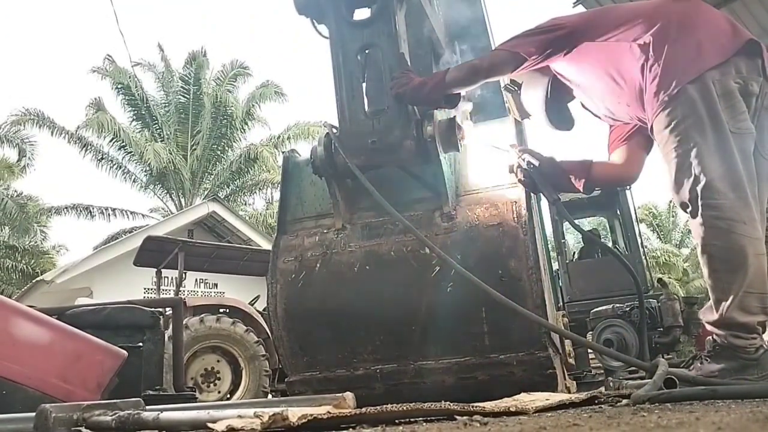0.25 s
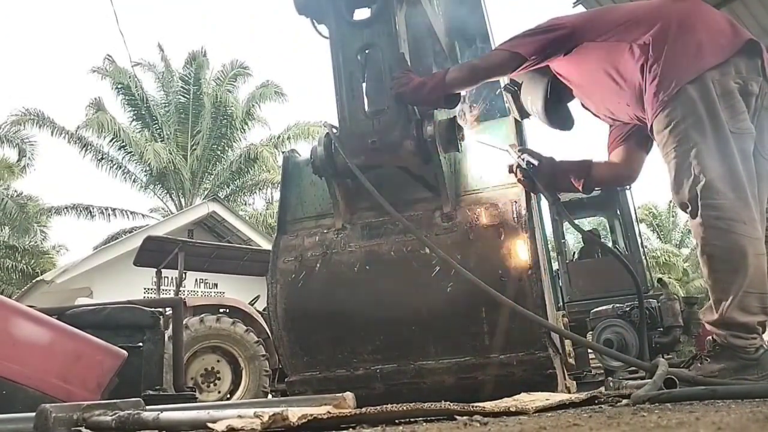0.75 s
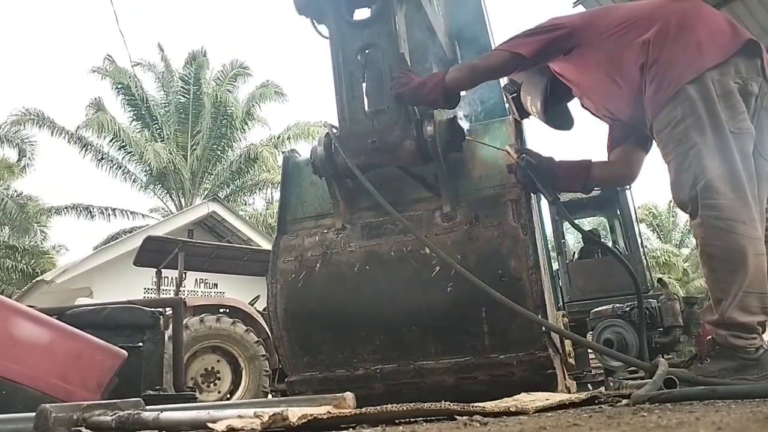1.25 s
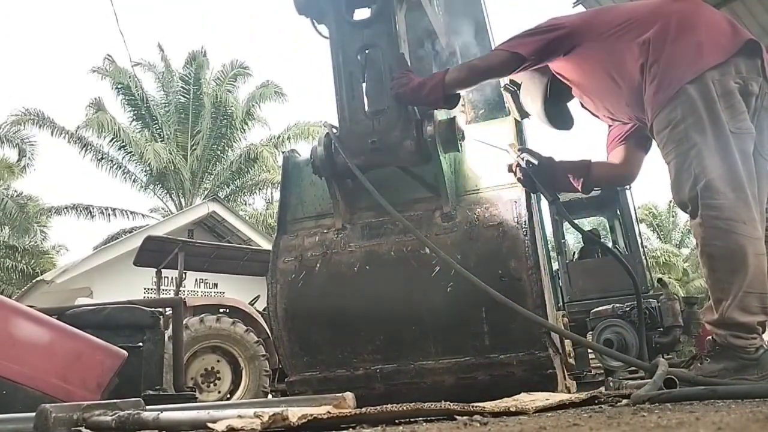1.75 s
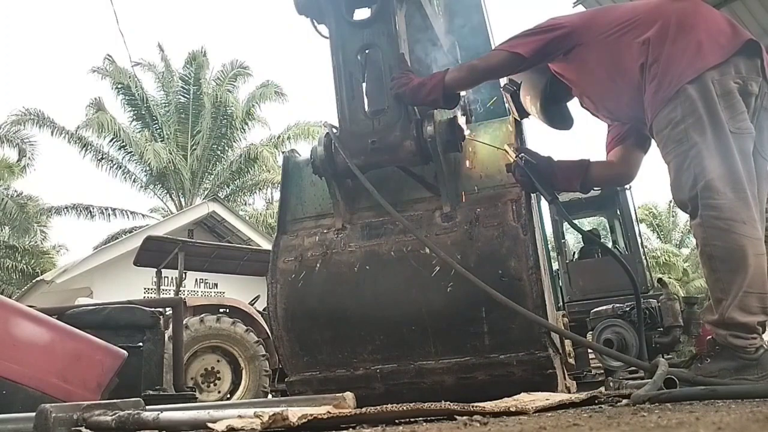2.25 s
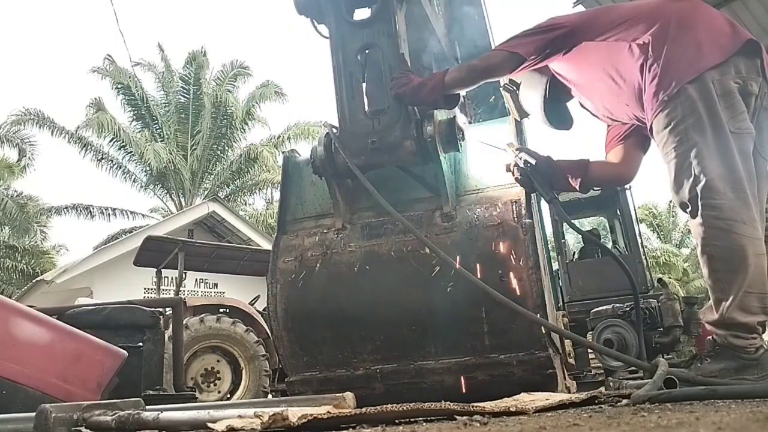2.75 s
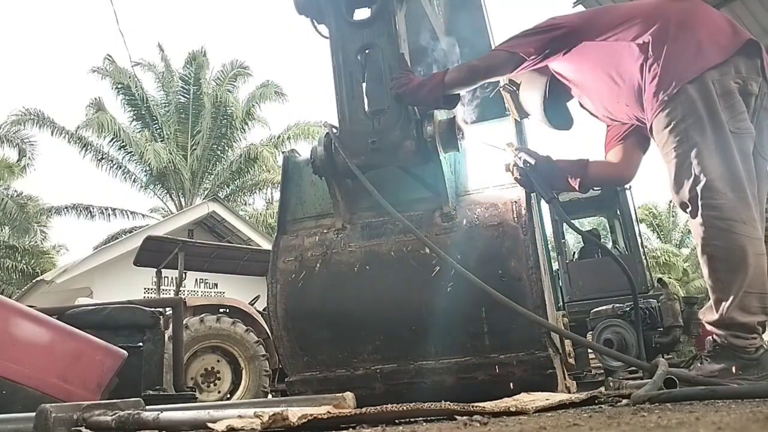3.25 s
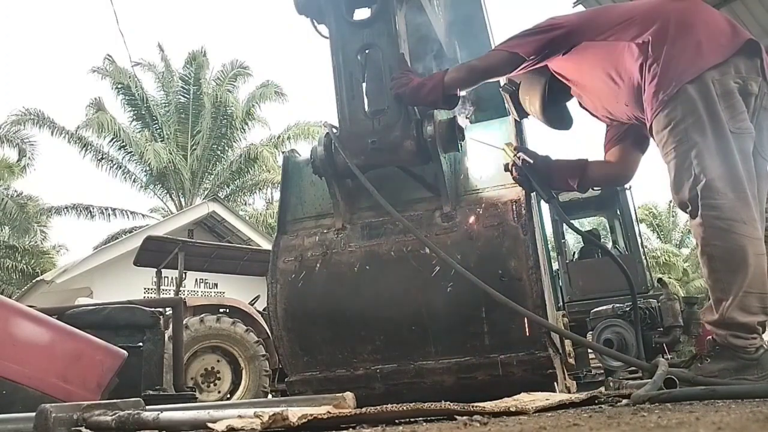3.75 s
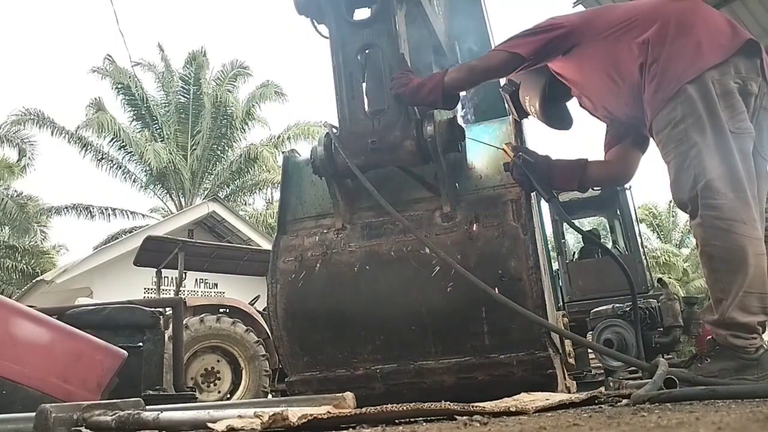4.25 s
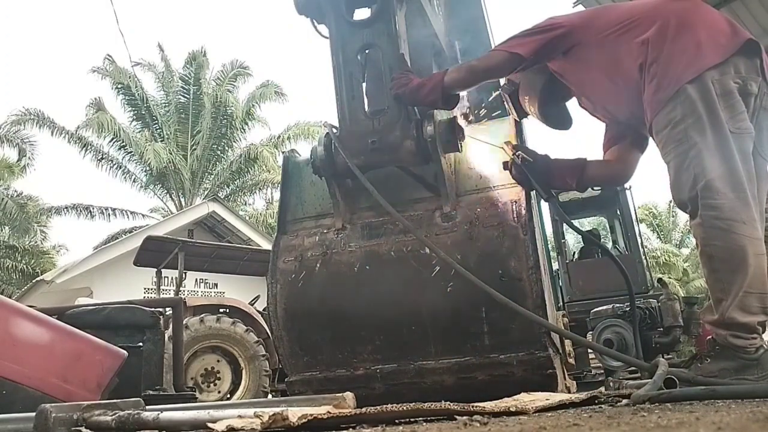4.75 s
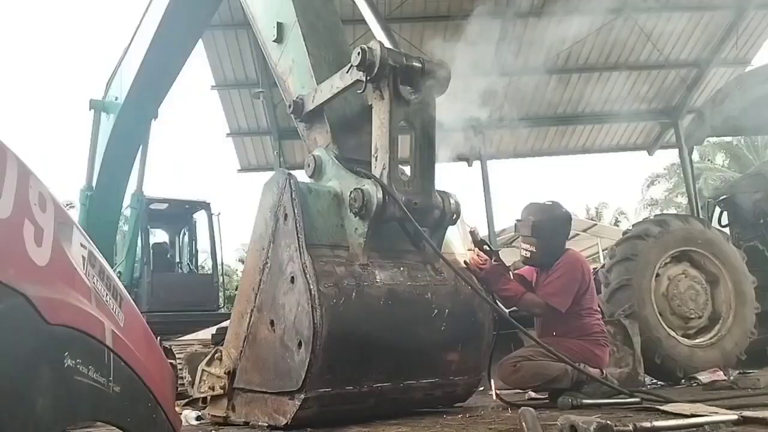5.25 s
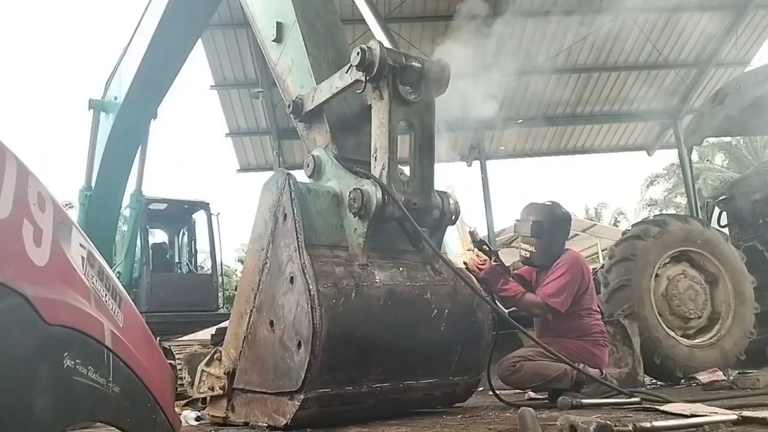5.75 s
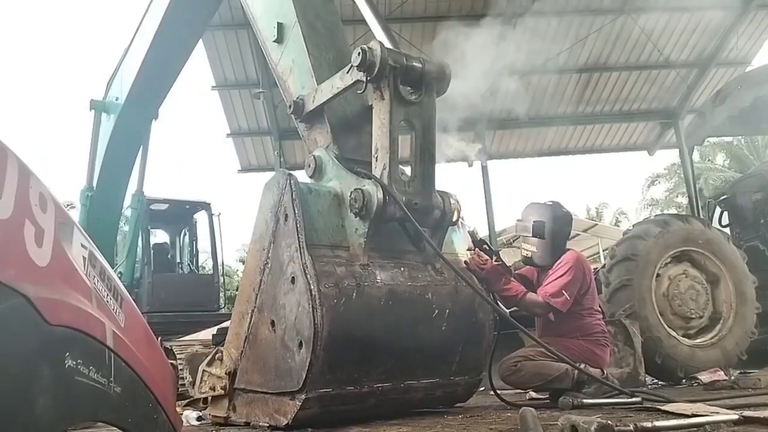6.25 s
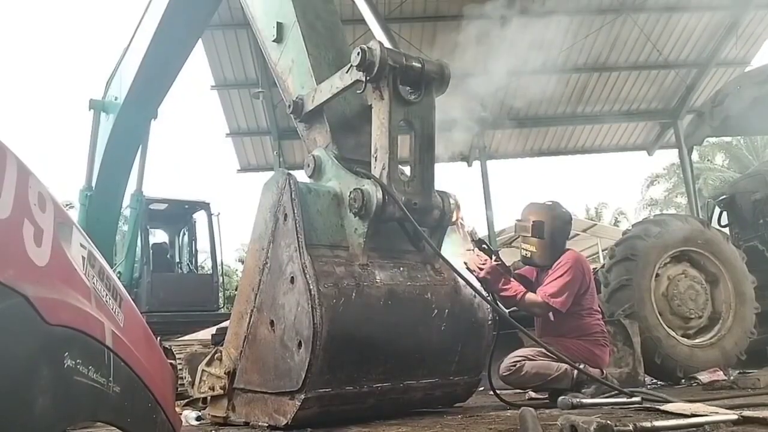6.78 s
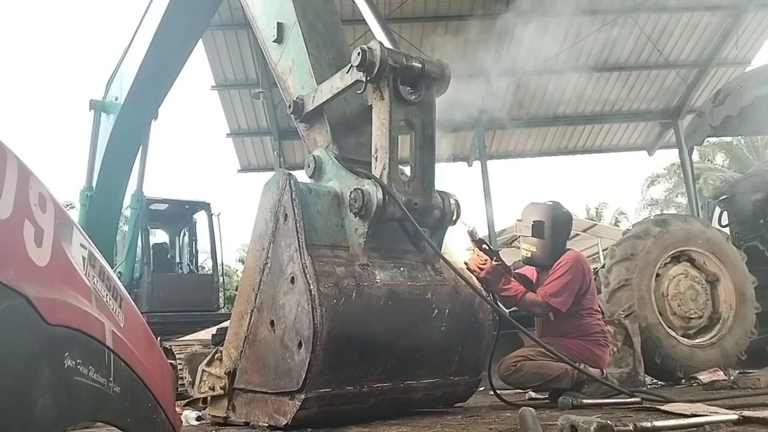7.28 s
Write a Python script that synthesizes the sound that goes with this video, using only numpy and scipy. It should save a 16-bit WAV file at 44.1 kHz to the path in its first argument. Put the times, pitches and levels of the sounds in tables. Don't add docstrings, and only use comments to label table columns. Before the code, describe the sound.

From 0 to 5.3 seconds, a small single-cylinder diesel generator runs steadily in an open yard, beating nearly thirteen times a second. Each cycle has a low exhaust thump, hard combustion knock and a short, ringing metallic valve clack, slightly uneven from beat to beat. Gear clatter, fan roar, wavering hum and resonant sheet-metal buzz fill the gaps. Beneath it a welding arc hisses faintly and crackles, with brighter spits around 0.2, 0.8, 2.1, 2.6 and especially 4.8 seconds. The sound cuts to total silence from 5.3 to 5.75 seconds. It then resumes abruptly from another spot, initially louder, the microphone gain settling over roughly the first second. The same engine has a denser low-mid roar and clatter, with deep gusty air rumble and small arc spits near 6.4, 6.7 and 7.4, ending abruptly around 7.5. The sound is mono and dry, with a slight ground reflection.

```python
import sys
import numpy as np
from scipy import signal
from scipy.fft import rfft, irfft, next_fast_len
from scipy.io import wavfile
from scipy.ndimage import uniform_filter1d

SR = 44100
rng = np.random.default_rng(int(sys.argv[2]) if len(sys.argv) > 2 else 0)


def linear_from_db(decibels):
    return 10 ** (np.asarray(decibels, float) / 20)


def log_audio(samples):
    frames = np.atleast_2d(samples).T
    limited = np.clip(frames, -1, 1)
    pcm = np.round(limited * 32767).astype(np.int16)
    wavfile.write(sys.argv[1], SR, pcm)


N = 331632
TIME = np.arange(N) / SR
FIRST, SECOND = (0, 5.2955), (5.7525, 7.53)


def colour(x, points):
    hz, db = np.transpose(points)
    size = next_fast_len(len(x))
    log_hz = np.log(np.arange(size // 2 + 1) * SR / size + 1)
    gain = linear_from_db(np.interp(log_hz, np.log(hz), db, left=-60))
    y = irfft(rfft(x, size) * gain, size)[:len(x)]
    return y / np.std(y)


def ring(x, hz, t60_ms):
    radius = np.exp(-np.log(1000) * 1000 / (t60_ms * SR))
    angle = 2 * np.pi * hz / SR
    return signal.lfilter([0, radius * np.sin(angle)], [1, -2 * radius * np.cos(angle), radius ** 2], x)


def strikes(s, size):
    at = (s * SR).astype(int)
    inside = (at >= 0) & (at < N)
    return np.bincount(at[inside], size[inside], N)


def walk(rate):
    hold = int(SR / rate)
    levels = np.repeat(rng.standard_normal(N // hold + 1), hold)
    return 0.93 * uniform_filter1d(uniform_filter1d(levels, hold), hold)[:N]


def effort_curves(points):
    s, *columns = np.transpose(points)
    return [np.interp(TIME, s, db - np.mean(db)) for db in columns]


def breeze(db, top_hz, gust_db):
    rumble = colour(rng.standard_normal(N), [(20, -6), (top_hz, 0), (3 * top_hz, -30)])
    return linear_from_db(db + gust_db * walk(5)) * rumble


def arc(sizzle_db, crackle_rate=50, crackle_db=17):
    # t/s, peak level/dB
    spits = [(0.2204, -34), (0.76, -38), (0.845, -38), (0.9053, -45), (0.9991, -38), (1.0909, -47),
             (1.2146, -40), (1.9939, -47), (2.0737, -29), (2.3077, -36), (2.641, -35), (3.0205, -42),
             (3.1522, -49), (3.714, -43), (3.7539, -40), (4.0058, -39.5), (4.2807, -40), (4.4727, -44),
             (4.7876, -27.5), (4.8004, -33.5), (5.1986, -42), (5.229, -38.5), (6.3619, -41), (6.7037, -37),
             (7.443, -38)]
    # f/Hz, level/dB per Hz
    spark = [(1000, -28), (3000, -13), (6000, -6), (8000, -8.5), (10500, -10), (12500, -4), (14000, -7),
             (14900, -3.5), (15300, -7)]
    when, size = rng.random((int(crackle_rate * N / SR), 2)).T
    faint = strikes(when * N / SR, linear_from_db(crackle_db - 15 * size))
    crackle = signal.lfilter([1], [1, -np.exp(-1 / (0.0027 * SR))], faint)
    envelope = (crackle + linear_from_db(1.5 * walk(15))) * linear_from_db(sizzle_db)
    for s, db in spits:
        t60_s = .025 - .0007 * max(db + 40, 0)
        span = slice(int(s * SR), int((s + .06) * SR))
        age = TIME[span] - s
        attack = np.clip(age / .0006, 0, 1)
        envelope[span] += linear_from_db(db - 3.5 - 60 * age / np.clip(t60_s, .004, .1)) * attack
    return envelope * colour(rng.standard_normal(N), spark)


def panels():
    # f/Hz, t60/ms, rms level/dB
    cowling = [(963.5, 99, -51), (1162.5, 90, -48.5), (1288.4, 170, -50.5), (1420, 150, -64)]
    total = 0
    for hz, t60_ms, db in cowling:
        total = total + linear_from_db(db) * ring(rng.standard_normal(N), hz, t60_ms) / np.sqrt(t60_ms)
    return total * np.sqrt(4 * np.log(1000) * 1000 / SR)


def hum(cycle, orders, waver_db):
    total = 0
    for multiple, db in orders.items():
        tone = np.sin(2 * np.pi * (multiple * cycle + rng.random()))
        total = total + np.sqrt(2) * linear_from_db(db + waver_db * walk(6)) * tone
    return total


def roar(cycle, points, locked, locked_hz, throb_db):
    size = int(SR / 12.8)
    clatter = rng.standard_normal(size)[(cycle % 1 * size).astype(int) % size]
    clatter = signal.sosfilt(signal.butter(4, locked_hz, fs=SR, output="sos"), clatter)
    throb = linear_from_db(throb_db * np.cos(2 * np.pi * (cycle - .15)) + 1.12 * walk(9) + 0.89 * walk(60))
    return colour(locked * clatter + throb * rng.standard_normal(N), points)


def valves(beat_s, scatter_db, share_db, burst_ms, jitter_ms, rattle, flank_db, spot):
    # f/Hz, t60/ms, level/dB
    casing = [(2480, 90, -4.5), (2938, 260, -1), (3156, 210, -4), (3480, 70, -8), (3563, 130, -4),
              (3780, 150, -3.5), (3820, 15, -2.5), (3940, 60, -2.5), (4150, 33, 0.5), (4240, 60, 1.5),
              (4490, 12, 0), (5380, 37, -7), (5730, 40, -6), (6250, 20, -6.5), (6800, 12, -12.5),
              (8440, 8, -10.5), (9400, 8, -22.5), (10050, 10, -14.5), (11530, 7, -6), (13100, 9, -18.5),
              (14730, 10, -17.5)]
    # t/ms after the beat, level/dB at the first spot, level/dB at the second
    landings = [
        (-2, -9, -3),
        (20.5, -2, -1),
        (46.5, -17.5, -16.5),
    ]
    # t/s, level/dB over a usual one
    hard_landings = [(0.02, 2), (0.7236, 3.5), (0.8046, -1.5), (0.9567, 3.5), (1.1922, 1), (1.893, 5.5),
                     (2.1293, -2), (3.6364, -1.5), (3.7234, 7), (4.789, 4), (5.779, 0), (5.8539, 1.5),
                     (5.8763, -3), (5.9324, -3), (6.0104, -0.5), (6.032, -2), (6.0884, 0), (6.1657, 0),
                     (6.1881, 1.5), (6.3434, -2), (6.7038, 2), (6.9485, 1), (7.1823, -1.5), (7.202, -0.5),
                     (7.417, -2)]
    fade = np.exp(-1000 / (burst_ms * SR))
    late, size = rng.standard_normal((2, len(landings), len(beat_s)))
    ms, db = np.transpose(landings)[[0, spot], :, None]
    hard_s, hard_db = np.transpose(hard_landings)
    when = np.r_[(beat_s + (ms + jitter_ms * late) / 1000).ravel(), hard_s]
    force_db = np.r_[(db + scatter_db * size).ravel(), hard_db - 1.5]
    heard = slice(max(int(beat_s[0] * SR), 0), int(beat_s[-1] * SR))
    out, full = 0, np.zeros(N)
    for hz, t60_ms, mode_db in casing:
        swell_db = force_db * np.clip(4500 / hz, .4, 1)
        hits = strikes(when, linear_from_db(swell_db + share_db * rng.standard_normal(len(when))))[heard]
        burst = signal.lfilter([1], [1, -fade], hits) + rattle
        mode = ring(burst * rng.standard_normal(len(hits)), hz, t60_ms)
        out = out + linear_from_db(mode_db + flank_db * (hz < 3700)) * mode / np.median(abs(mode))
    full[heard] = out / np.median(abs(out))
    return full


def crank(beats, cycle_s=.0781):
    s, k = np.transpose(beats)
    s = np.r_[s[0] - 2 * cycle_s, s, s[-1] + 3 * cycle_s]
    k = np.r_[k[0] - 2, k, k[-1] + 3]
    return np.interp(np.arange(k[0], k[-1] + 1), k, s), np.interp(TIME, s, k)


def blows(beat_s, table, scatter_db, jitter_ms):
    out = 0
    for ms, hz, t60_ms, db, swing in table:
        late, size = rng.standard_normal((len(beat_s), 2)).T
        when = beat_s + (ms + jitter_ms * late) / 1000
        out = out + ring(strikes(when, swing * linear_from_db(db + scatter_db * size)), hz, t60_ms)
    return uniform_filter1d(uniform_filter1d(out, size=9), size=9)


def generator(beats, table, orders, points, clack_db, roar_db, valve_db, flank_db, spot):
    beat_s, cycle = crank(beats)
    body = blows(beat_s, table, scatter_db=0.47, jitter_ms=0.055)
    body = body + hum(cycle, orders, waver_db=1.7) + panels()
    body = body + linear_from_db(roar_db) * roar(cycle, points, locked=0.34, locked_hz=1400, throb_db=0.25)
    body = signal.sosfiltfilt(signal.butter(2, 29, "high", fs=SR, output="sos"), body)
    clack = valves(beat_s, scatter_db=1.8, share_db=2.9, burst_ms=4.5, jitter_ms=0.92, rattle=0.2,
                   flank_db=flank_db, spot=spot)
    return body * linear_from_db(0.4 * walk(4)) + linear_from_db(valve_db + clack_db) * clack


def scene():
    # t/s, cycle number
    beats_1 = [
        (0.021, 0),
        (0.9601, 12),
        (1.5831, 20),
        (3.7726, 48),
        (4.7078, 60),
        (5.1765, 66),
    ]
    beats_2 = [
        (5.781, 0),
        (6.4041, 8),
        (7.4202, 21),
    ]
    # t/ms after the beat, f/Hz, t60/ms, level/dB, first swing (signed factor)
    blows_1 = [(-3, 80, 186, -21, -0.87), (-1.5, 146, 22.4, -25, -1), (-5, 1000, 19, -32, 1),
               (-2.5, 1400, 20, -30.5, -0.79), (61, 1124, 25, -33, 1), (7, 117.8, 134, -27.5, -1.25),
               (17.4, 548, 18, -20.5, 1), (18.5, 322, 23, -26, -1), (18.5, 1230, 22, -26, 1),
               (31, 421, 41.4, -26.5, -1.11), (33, 90, 86, -32.5, -1.2), (45, 388, 182, -34, 1),
               (70.5, 54, 450, -45, 0.042)]
    blows_2 = [(-6, 35, 330, -32, 0.69), (-1, 81.4, 138, -24.5, -1), (-1.5, 131, 29, -20.5, -1.14),
               (-6, 1050, 12, -27, 0.63), (-1.5, 1030, 14, -25, -1.25), (8.5, 1100, 27, -47, 0.77),
               (17.7, 376, 14, -19, -1), (19, 1160, 14, -23, 1), (20.7, 1160, 20, -22.5, 1),
               (24.5, 404, 67, -21.5, -0.76), (26.5, 524, 120, -33, -0.8), (28.5, 1030, 14, -39, 0.86),
               (40.5, 136.7, 65, -22.5, 0.99), (36.5, 1140, 12, -31, -1.3), (43.5, 1080, 23, -29.5, 0.95),
               (60, 1000, 37, -26.5, -1.22), (73.5, 116.7, 190, -31.5, 0.92)]
    hum_1 = {14: -49.5, 16: -48.5, 20: -49, 2: -54.5, 4: -52.5, 39: -48.5, 43: -51, 63: -57, 77: -50.5, 81:
             -55, 90: -55.5, 93: -53.5, 97: -55.5, 100: -49.5}
    hum_2 = {2: -56, 16: -50.5, 23: -55, 43: -51.5, 45: -49.5, 50: -48, 54: -49, 57: -54.5, 74: -49, 79:
             -49.5, 80: -57, 84: -61.5, 87: -52, 91: -50, 95: -45.5}
    # f/Hz, level/dB per Hz
    roar_1 = [(25, -8.5), (45, -4), (120, 1), (300, 2), (800, -1.5), (1000, -3), (1300, -8.5), (1390, -6.5),
              (2000, -12), (4300, -19.5), (5000, -23), (6600, -29), (7800, -33.5), (15500, -36.5)]
    roar_2 = [(25, 0), (50, 2.5), (200, 3), (420, 7.5), (500, -3), (750, 2), (1000, 4.5), (1250, 2),
              (1800, -6), (4300, -14.5), (5000, -14), (6600, -26), (8000, -30), (15500, -44)]
    # t/s, valve rattle level/dB, arc sizzle level/dB
    effort_1 = [(0.1, -2, 1), (0.5, -2, 1), (0.95, 3, 1), (1.65, -2, -2), (2.05, 1, 1), (2.4, 3, -3),
                (2.7, 0, -1), (3.1, 2, -3), (3.5, 0, 2), (4.0, 1, 2), (4.6, -3, 0), (5.2, -1, 1)]
    effort_2 = [(5.85, 0, 2), (6.2, -1, 2), (6.55, 1, -1), (6.85, -1, -3), (7.1, 0, 1), (7.4, 1, 0)]
    clack_1, sizzle_1 = effort_curves(effort_1)
    clack_2, sizzle_2 = effort_curves(effort_2)
    first = generator(beats_1, blows_1, hum_1, roar_1, clack_1,
                      roar_db=-35.5, valve_db=-56.9, flank_db=0.12, spot=1)
    second = generator(beats_2, blows_2, hum_2, roar_2, clack_2,
                       roar_db=-35, valve_db=-55.3, flank_db=-5.0, spot=2)
    second = second + breeze(-49.5, top_hz=51, gust_db=2.3)
    on_1, on_2 = [(TIME >= start) & (TIME < end) for start, end in (FIRST, SECOND)]
    sparks = arc(np.where(on_1, -68.7 + 2 * sizzle_1, -68 + 2 * sizzle_2))
    return (on_1 * first + on_2 * second + (on_1 | on_2) * sparks)[None]


def roll_off(x):
    return signal.sosfilt(signal.butter(12, 16610, fs=SR, output="sos"), x)


def record(dry, bounce=.3, lag=14):
    since = TIME - SECOND[0]
    gain_db = -1.2 + 5 * np.exp(-abs(since) / .38)
    dry = dry * linear_from_db((since > 0) * gain_db)
    treble = signal.sosfilt(signal.butter(1, 4000, "high", fs=SR, output="sos"), dry)
    dry = dry + bounce * np.roll(treble, int(lag), axis=1)
    mix = signal.sosfilt(signal.ellip(10, .5, 45, 15450, fs=SR, output="sos"), dry)
    return roll_off(mix)


dry = scene()
out = record(dry)
log_audio(out)
```